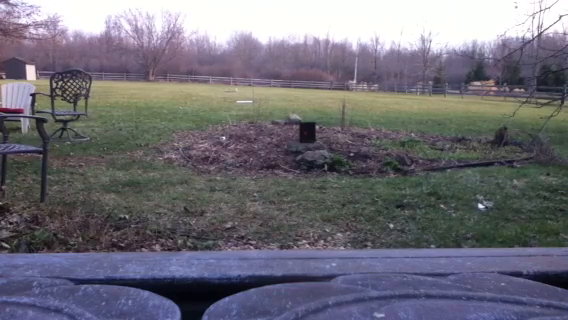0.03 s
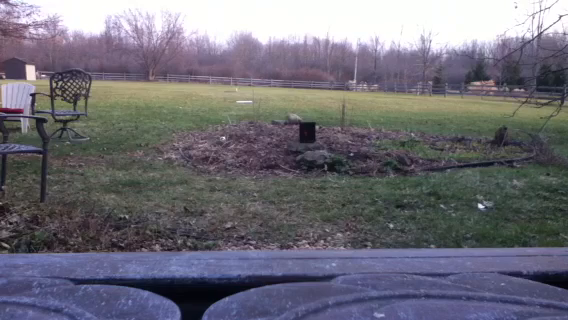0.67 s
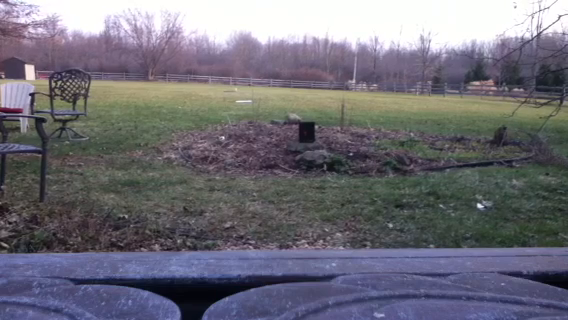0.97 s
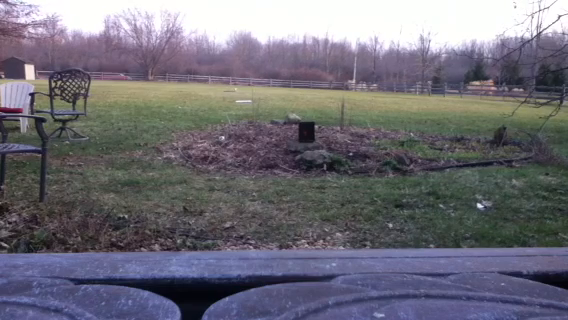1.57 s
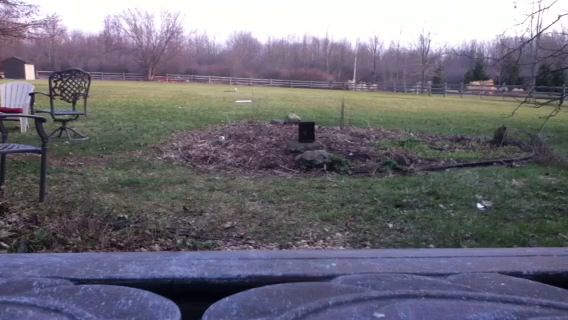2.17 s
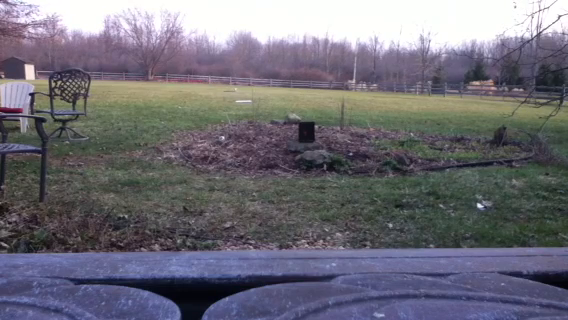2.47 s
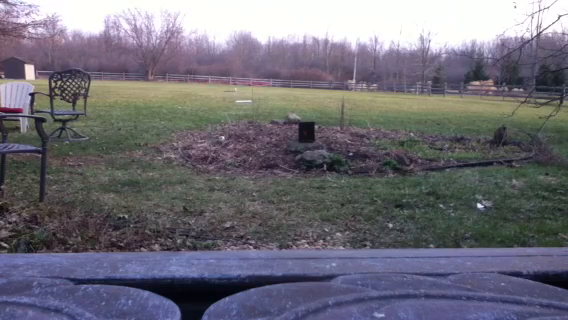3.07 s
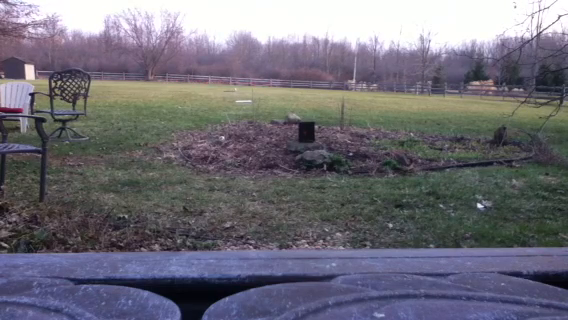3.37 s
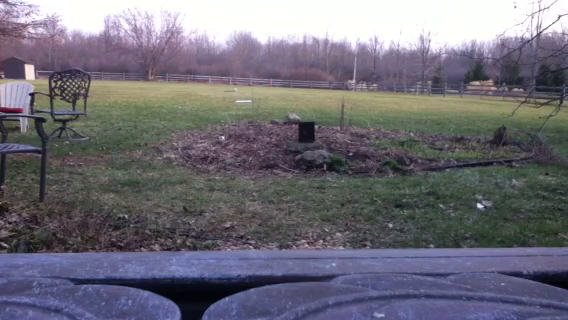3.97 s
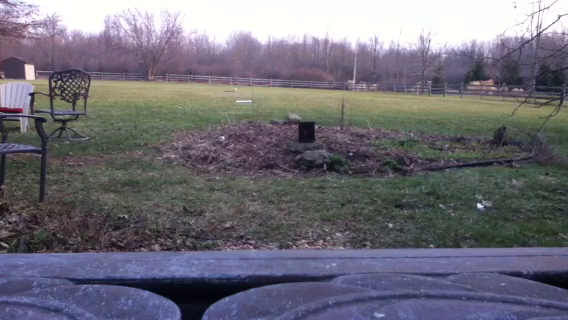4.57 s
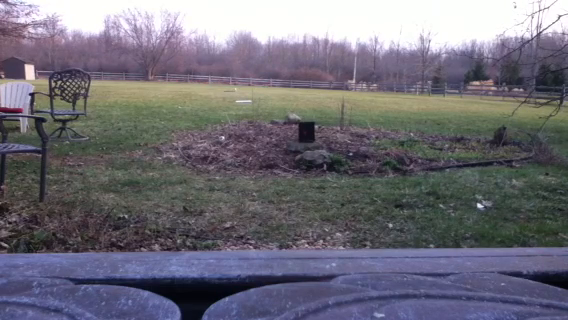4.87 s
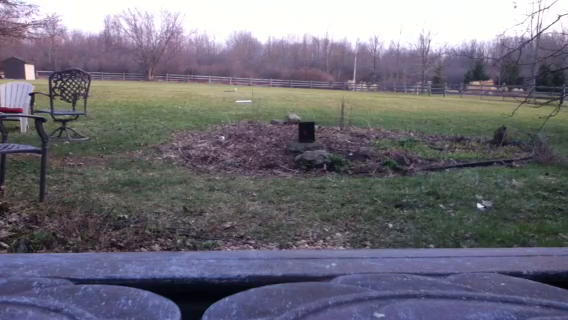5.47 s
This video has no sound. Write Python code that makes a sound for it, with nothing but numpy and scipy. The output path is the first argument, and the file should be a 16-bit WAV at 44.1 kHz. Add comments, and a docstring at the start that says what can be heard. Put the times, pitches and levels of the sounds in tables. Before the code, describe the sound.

Close by on a backyard porch, a pump air rifle pops once and a more distant steel can answers with a bright ping. After a short lull come clothing rustle and the squeaky metal snaps of reloading. Four steady pump strokes follow, each a soft rubbing swing ending in a sharp, hollow clap. The sounds have a short echo, and a quiet low rumble of open air lies underneath.

```python
"""A pump air rifle is fired from a porch: released air pops, and the pellet sets a steel can ringing.
Sleeves rustle by friction; the bolt squeaks by stick-slip and snaps open and shut. The pump lever is
then swung out and clapped home four times, each impact exciting the modes of the hollow fore-end and
squeezing air through the valve. Porch and yard reverberate over a low outdoor rumble."""
import sys
import numpy as np
from scipy import signal
from scipy.fft import rfft, irfft, next_fast_len
from scipy.io import wavfile
from scipy.ndimage import uniform_filter1d

SR = 44100
rng = np.random.default_rng(int(sys.argv[2]) if len(sys.argv) > 2 else 0)


def wav_out(sig):
    """Save sig, one row per channel (or a flat mono array), as 16-bit PCM at SR to the path in sys.argv[1]."""
    wavfile.write(sys.argv[1], SR, np.round(np.clip(np.atleast_2d(sig).T, -1, 1) * 32767).astype(np.int16))


N = 251811
TIME = np.arange(N) / SR
AGE = np.arange(2 ** 15) / SR   # time since an event began [s]

# spectra of the noises and of the reverberation: (frequency [Hz], relative level [dB])
RUMBLE_SPECTRUM = [(15, -2), (30, -3), (60, -6.5), (160, -7), (300, -12.5), (600, -22), (2000, -53)]
HUSH_SPECTRUM = [(100, 1.5), (500, -4), (1600, 6), (2800, -3.5), (6000, -7.5), (12000, -12.5),
                 (16000, -19.5)]
SHOT_SPECTRUM = [(60, -1.5), (300, 1.5), (900, 0.5), (2500, -3.5), (5000, 3), (8000, 3.5), (12000, 3),
                 (14000, -18.5), (16000, -25)]
CAN_SPECTRUM = [(100, -15), (1000, -10), (1800, -0.5), (3000, 0), (6500, 6.5), (10000, 7.5), (12500, 6),
                (16000, -16.5)]
FRICTION_SPECTRUM = [(200, -44), (500, -10), (690, 4.5), (900, 1), (1500, 1), (2300, 2.5), (3500, 5),
                     (6500, 1.5), (8500, 4.5), (11000, -7.5), (13500, -13.5), (16000, -49)]
STEEL_SPECTRUM = [(100, -28), (450, -10.5), (750, 0.5), (1300, 1), (2500, 6.5), (4500, 7.5), (7000, 3.5),
                  (10000, 3), (13000, -0.5), (16000, -20)]
LEVER_SPECTRUM = [(60, -31), (170, -14), (290, 4.5), (450, -0.5), (850, 2), (1400, 10.5), (2600, 11.5),
                  (3600, 7), (6000, 5), (9000, 1), (12000, -5.5), (16000, -31)]
REVERB_SPECTRUM = [(100, -5), (500, 1.5), (1500, 1), (4000, -1.5), (8500, 2.5), (12000, 0.5), (16000, -3.5)]
# slow course of the rumble: (time [s], level before RUMBLE_GAIN_DB [dB])
RUMBLE_LEVELS = [(1.5, -53.5), (3.18, -52), (4.96, -57.5), (5.7, -54.5)]
# hammer, then air blast: (time [s], level [dB], t60 [s], ring frequency [Hz], ring level [dB])
SHOT_PULSES = [(0.0361, -16, 0.043, 5140, -12.5), (0.0401, -6, 0.0073, 598, -32.5),
               (0.047, -24, 0.094, 280, -36), (0.0546, -5, 0.001, 620, -37.5),
               (0.063, -34, .03, 6680, -35.5)]
# pellet on the can, then falling bits: (time [s], level [dB], t60 [s], gain of the modes [dB])
CAN_IMPACTS = [(0.111, -15, 0.05, -31.5), (0.253, -47.5, 0.044, -80), (0.301, -51.5, 0.05, -76.5)]
# normal modes of the can and the fore-end's shell: (frequency [Hz], relative level [dB], t60 [s])
CAN_MODES = [(469, -5.5, 0.33), (731, -12, 0.11), (1245, -16.5, 0.52), (1627, -3.5, 0.25),
             (1773, -11.5, 0.49), (1960, -7.5, .13), (2310, -7, 0.12), (2860, -25, .3), (3515, -5, .14),
             (4360, -13.5, 0.17), (6240, -14.5, 0.52), (7000, -8.5, 0.15), (7500, -3, .11),
             (9330, 10, 0.092), (9889, -24, .19), (11530, -21.5, .3)]
FORE_END_MODES = [(1028, -4, 0.071), (1177, -19, 0.1), (1337, -3, 0.16), (1384, 3.5, 0.068),
                  (1415, -11.5, 0.33), (1540, -10.5, 0.26), (1590, -1.5, 0.15), (1690, 1.5, 0.045),
                  (2287, -10, 0.033), (2340, 12, 0.019), (2800, -4.5, 0.05), (3760, -7, 0.14),
                  (4600, -17, 0.23)]
# sleeves and hands: (peak time [s], level [dB], 60 dB rise [s], 60 dB release [s])
SLEEVE_RUSTLES = [(1.03, -56, 0.41, 0.6), (1.12, -53.5, 0.28, 0.18), (1.38, -43.5, 0.35, 0.29),
                  (1.5, -41.5, 0.16, 0.67), (1.73, -54, 0.68, 0.2), (2.56, -51, .35, .7),
                  (2.78, -53.5, .7, 0.71), (3.335, -39.5, 0.1, 0.23), (3.5, -57, 0.43, 0.32),
                  (4.4, -45, 0.36, 0.15), (4.94, -53.5, 0.23, 0.98)]
# bolt and linkage contacts: (time [s], level [dB], t60 [s], ring frequency [Hz], tilt [dB/octave])
STEEL_CLICKS = [(1.4566, -41.5, .04, 3320, 0), (1.801, -27, .018, 3220, -3),
                (1.8055, -17.5, 0.023, 2450, 1), (1.8187, -16, 0.028, 2920, 0), (1.838, -31, .035, 2450, 1),
                (1.871, -15, 0.025, 3550, 2.5), (2.0673, -27, 0.024, 2610, -1),
                (2.1214, -38, 0.023, 2650, -2.5), (2.147, -33.5, 0.12, 765, -3),
                (2.1719, -19, 0.047, 1170, -0.5), (2.3833, -48, 0.067, 3450, -0.5),
                (2.4805, -33, 0.054, 3190, .5), (2.6989, -45, 0.026, 4280, 1.5),
                (2.822, -25.5, 0.025, 2280, -3), (2.834, -25.5, 0.029, 1830, -2.5),
                (2.848, -31.5, 0.073, 1260, -2), (3.0519, -40, .025, 6020, 0.5),
                (3.601, -38, 0.021, 5450, -4), (3.636, -39, 0.035, 2750, -5),
                (3.6749, -35.5, .03, 2340, -4.5), (4.3164, -34.5, 0.019, 2790, -3.5),
                (5.0556, -38, 0.031, 2740, -3.5), (5.348, -45, 0.044, 2550, -4),
                (5.637, -45.5, 0.036, 2500, -3)]
# stock against the body: (time [s], level [dB], frequency [Hz], t60 [s])
STOCK_BUMPS = [(1.49, -42.5, 194.4, 0.41), (1.492, -41.5, 308, 0.087)]
# dry bolt, one list a squeak: (time [s], frequency [Hz], level [dB])
BOLT_SQUEAKS = [
    [(1.665, 8320, -66), (1.685, 9960, -46), (1.71, 10500, -63)],
    [(1.735, 5870, -57), (1.768, 5650, -38), (1.785, 5620, -50), (1.803, 5730, -32)],
    [(1.92, 5690, -58), (1.96, 5260, -57), (2.01, 4950, -49.5), (2.065, 4800, -60)],
]
# swinging lever: (time [s], level [dB], t60 [s], ring frequency [Hz], ring level [dB])
LEVER_KNOCKS = [(2.557, -38, 0.027, 2150, -37), (2.7357, -55, .02, 2470, -44),
                (2.823, -34, 0.044, 1800, -33), (2.954, -41, 0.07, 4400, -32),
                (2.9633, -33.5, 0.017, 2300, -27.5), (3.0944, -42.5, 0.047, 2320, -49),
                (3.1841, -39, 0.051, 2570, -32), (3.195, -26.5, 0.042, 1020, -19.5),
                (3.4173, -36, 0.051, 2090, -27.5), (3.8194, -47, 0.014, 2000, -52),
                (3.9387, -50, .036, 2580, -32.5), (3.946, -49, 0.079, 2470, -32.5),
                (4.1606, -40.5, 0.066, 2250, -25), (4.329, -37.5, 0.13, 2090, -34),
                (4.4148, -38.5, 0.038, 2310, -32.5), (4.5467, -48, 0.023, 2470, -44.5),
                (4.599, -50, 0.048, 2380, -45), (4.8797, -42.5, 0.092, 2160, -24),
                (5.069, -41.5, 0.24, 2250, -31), (5.1315, -44.5, 0.025, 4300, -39),
                (5.2611, -60, 0.019, 1070, -45), (5.503, -50, .03, 2020, -28),
                (5.5776, -40.5, 0.033, 2330, -45)]
# pump strokes: (clap time [s], level [dB], t60 [s], tilt [dB/octave], slap frequency [Hz],
# fore-end gain [dB], thump [dB], cavity [dB], swing-in slide [dB], squeeze [dB], swing-out slide [dB])
PUMP_STROKES = [(3.204, -17, 0.054, -1.4, 1400, -21, -18.5, -40, -39, -48, -42.5),
                (3.9623, -16.5, 0.059, 2, 2590, -23, -34, -26, -54.5, -72, -46.5),
                (4.6754, -17.5, 0.034, 0.5, 2672, -25, -33, -27, -49.5, -70, -47),
                (5.4066, -15.5, 0.058, -.3, 1440, -19.5, -27.5, -25, -53, -53, -39.5)]
# the slides of a stroke: (peak time after the clap [s], 60 dB rise [s], 60 dB release [s])
SWING_IN, SQUEEZE, SWING_OUT = (-0.338, 0.12, 0.35), (-0.054, 0.46, 1), (0.12, 0.41, 0.51)
# air in the valve and in the gap under the lever: (time after the clap [s], frequency [Hz])
VALVE_PITCH = [(0, 3200), (.013, 9000), (.03, 10000)]
GAP_PITCH = [(.04, 1450), (.11, 2100)]
# their envelopes: (time after the clap [s], relative amplitude [1])
VALVE_ENVELOPE = [(0, .72), (.005, .36), (.013, 1), (.019, 0)]
GAP_ENVELOPE = [(0, 0), (.09, 1), (.25, 0)]

PORCH_DB, PORCH_T60, YARD_DB = -3.5, 0.24, -30.5   # reverberation: gain, decay [s], the yard's share
RUMBLE_GAIN_DB, HUSH_DB = 1.5, -59.5
DIP_DB, DIP_HOLD_S, DIP_RECOVERY_S = 11, 0.38, 1
TREES_DB, TREES_T60 = -53, 1.6
CLICK_RING_DB, CLICK_T60, CLICK_DAMPING_DB = 2, 0.027, 9   # ring gain at this t60 [s]; loss per doubling
CAVITY_HZ, CAVITY_T60, OPEN_LEAK_T60 = 677, 0.19, 0.32
KNOCK_CAVITY_DB, GAP_DB = -1, -5   # relative to the knock; to the swing-out slide
SLAP_DB, VALVE_DB, LATCH_DB = 7.5, -10.5, -7   # relative to the clap
SLIDE_FLUTTER_DB, SLIDE_JERK_DB = 1.47, 2.85
INTAKE_DELAY_S, INTAKE_DB = .144, -41


def from_db(db):
    """Amplitude grows tenfold with every 20 dB."""
    return 10 ** (np.asarray(db) / 20)


def rms_one(x):
    """Division by the RMS value gives unit power."""
    return x / np.sqrt(np.mean(x ** 2) + 1e-20)


def add(out, s, sound):
    """Superposition: a sound adds to the others from time s on."""
    start = max(0, round(s * SR))
    out[start:start + len(sound)] += sound[:N - start]


def fade(t60):
    """Damping: amplitude falls exponentially, by 60 dB in t60 seconds."""
    return from_db(-60 * AGE / max(t60, 1e-3))


def swell(peak_s, rise_s, release_s):
    """Exponential growth and decay meet at a peak; rise and release each span 60 dB."""
    return from_db(-60 * np.maximum((peak_s - TIME) / rise_s, (TIME - peak_s) / release_s))


def drift(rate, size):
    """A random process of limited bandwidth: Gaussian values, rate a second, joined by lines."""
    knots = rng.standard_normal(size // 8)
    return np.interp(np.arange(size) * rate / SR, np.arange(len(knots)), knots)


def colour(x, spectrum, tilt_db=0):
    """A minimum-phase filter imposes a spectrum, tilted by tilt_db an octave about 4 kHz."""
    size = next_fast_len(len(x), real=True)
    size += size % 2
    octave = np.log2(np.maximum(np.fft.rfftfreq(size, 1 / SR), 10) / 4000)
    hz, db = np.transpose(spectrum)
    shape_db = np.interp(octave, np.log2(hz / 4000), db) + tilt_db * np.maximum(octave, -3)
    cepstrum = irfft(np.log(from_db(shape_db)))
    # folding the cepstrum makes the filter causal
    cepstrum[1:size // 2] *= 2
    cepstrum[size // 2 + 1:] = 0
    return irfft(rfft(x, size) * np.exp(rfft(cepstrum)))[:len(x)]


def crack(t60, spectrum, tilt_db=0):
    """Modal overlap: dense, short-lived modes merge into noise; longer contacts start more softly."""
    attack = 1 - fade(min(0.5 * t60 ** 2, t60 / 2))
    envelope = fade(t60) * attack
    burst = rng.standard_normal(len(AGE)) * envelope
    return colour(burst * np.linalg.norm(envelope) / np.linalg.norm(burst), spectrum, tilt_db)


def ring(hz, t60):
    """A damped mode; rattling loose parts modulate its phase and amplitude, most at high pitch."""
    looseness = min(hz / 2500, 1)
    blur = .7 * looseness * drift(130, len(AGE))
    rattle = from_db(2 * looseness * drift(250, len(AGE)))
    return np.sin(2 * np.pi * hz * AGE + blur - blur[0]) * rattle * fade(t60)


def ring_all(modes, scatter_db):
    """A struck body vibrates as a sum of normal modes, weighted anew by every blow."""
    return sum(rng.choice([-1, 1]) * from_db(db + scatter_db * rng.standard_normal()) * ring(hz, t60)
               for hz, db, t60 in modes)


def noise_band(hz, width_hz):
    """Random quadrature modulation spreads a tone into a band of noise."""
    phase = 2 * np.pi * np.cumsum(hz) / SR
    return rms_one(drift(width_hz, len(hz)) * np.sin(phase) + drift(width_hz, len(hz)) * np.cos(phase))


def linger(power, t60):
    """Sound energy stored in a space leaks away exponentially."""
    retained = from_db(-120 / (max(t60, 1e-3) * SR))
    return signal.lfilter([1 - retained], [1, -retained], power + 1e-18)


def porch(x, wet_db=PORCH_DB, t60=PORCH_T60, yard_db=YARD_DB):
    """Diffuse reverberation: boards and wall add a short tail, the yard a faint long one."""
    arriving = linger(x ** 2, t60=0.027)
    power = linger(arriving, t60) + from_db(2 * yard_db) * linger(arriving, t60=0.63) / t60
    # many paths blur the fine spectrum of the source
    timbre = np.sqrt(np.abs(uniform_filter1d(np.abs(rfft(x)) ** 2, size=len(x) // 110)))
    scattered = irfft(timbre * np.exp(2j * np.pi * rng.random(len(timbre))), len(x))
    return x + from_db(wet_db) * np.sqrt(power) * rms_one(colour(scattered, REVERB_SPECTRUM))


def open_air():
    """Ambient rumble and hush dip at the shot, whose echo from the trees adds to the hush in power."""
    since_shot = TIME - SHOT_PULSES[0][0]
    depth = (since_shot > 0) * np.clip(1 - (since_shot - DIP_HOLD_S) / DIP_RECOVERY_S, 0, 1)
    dip = from_db(-DIP_DB * depth)
    rumble_db = np.interp(TIME, *np.transpose(RUMBLE_LEVELS)) + RUMBLE_GAIN_DB
    rumble = from_db(rumble_db) * rms_one(colour(rng.standard_normal(N), RUMBLE_SPECTRUM))
    hush = rms_one(colour(rng.standard_normal(N), HUSH_SPECTRUM))
    echo = from_db(TREES_DB) * swell(CAN_IMPACTS[0][0], rise_s=.1, release_s=TREES_T60)
    return dip * rumble + np.hypot(dip * from_db(HUSH_DB), echo) * hush


def shot():
    """Sudden expansion: the hammer opens the valve and compressed air pops out of the muzzle."""
    out = np.zeros(N)
    for s, db, t60, hz, ring_db in SHOT_PULSES:
        add(out, s, from_db(db) * crack(t60, SHOT_SPECTRUM) + from_db(ring_db) * ring(hz, t60=0.016))
    return out


def can():
    """Impulse excitation: the pellet smacks thin steel, which rings on in its normal modes."""
    out = np.zeros(N)
    for s, db, t60, ring_db in CAN_IMPACTS:
        smack = from_db(db) * crack(t60, CAN_SPECTRUM)
        add(out, s, smack + from_db(ring_db) * ring_all(CAN_MODES, scatter_db=5.5))
    return out


def friction_envelope():
    """Incoherent sources add in power: the rustles, and three slides to each pump stroke."""
    moves = list(SLEEVE_RUSTLES)
    for s, *_, in_db, squeeze_db, out_db in PUMP_STROKES:
        slides = [(in_db, SWING_IN), (squeeze_db, SQUEEZE), (out_db, SWING_OUT)]
        for db, (after_s, rise_s, release_s) in slides:
            moves.append((s + after_s, db, rise_s, release_s))
    return np.sqrt(sum((from_db(db) * swell(s, rise, release)) ** 2 for s, db, rise, release in moves))


def rubbing():
    """Sliding friction of sleeves and piston makes a hiss, roughened by slips of a few milliseconds."""
    unevenness = from_db(SLIDE_FLUTTER_DB * drift(160, N) + SLIDE_JERK_DB * drift(55, N))
    slips = (rng.random(N) < 160 / SR) * rng.random(N) ** 2   # about 160 a second
    grit = signal.fftconvolve(slips, fade(.01))[:N]
    friction = rng.standard_normal(N) * (1 + 2 * grit)
    return friction_envelope() * unevenness * rms_one(colour(friction, FRICTION_SPECTRUM))


def snap(db, t60, tilt_db):
    """A brief contact of steel on steel radiates a broad spectrum, which the porch scatters."""
    return porch(from_db(db) * crack(t60, STEEL_SPECTRUM, tilt_db), t60=0.16)


def steel_clicks():
    """Contact damping: bolt and linkage snap and ring, the more weakly the longer they touch."""
    out = np.zeros(N)
    for s, db, t60, hz, tilt_db in STEEL_CLICKS:
        ring_db = db + CLICK_RING_DB - CLICK_DAMPING_DB * np.log2(t60 / CLICK_T60)
        add(out, s, snap(db, t60, tilt_db) + from_db(ring_db) * ring(hz, t60=0.018))
    return out


def stock_bumps():
    """A soft impact excites only low frequencies: the stock thuds against the body."""
    out = np.zeros(N)
    for s, db, hz, t60 in STOCK_BUMPS:
        thud = noise_band(np.full(len(AGE), hz), width_hz=123)
        add(out, s, from_db(db) * thud * (fade(t60) - fade(0.007)))
    return out


def bolt_squeaks():
    """Stick-slip oscillation of dry steel gives a thin, unsteady tone with a skirt of hiss."""
    out = np.zeros(N)
    for squeak in BOLT_SQUEAKS:
        s, hz, db = np.transpose(squeak)
        pitch = np.interp(TIME, s, hz) * (1 + .003 * drift(500, N))
        level_db = np.interp(TIME, s, db, left=-140, right=-140) + 2 * drift(150, N)
        envelope = uniform_filter1d(from_db(level_db), size=200)
        tone = np.sin(2 * np.pi * np.cumsum(pitch) / SR)
        out += envelope * (tone + .25 * noise_band(pitch, width_hz=450))
    return out


def lever_knocks():
    """The lever knocks at the turns of its swing and excites the cavity, damped by its open leak."""
    out = np.zeros(N)
    for s, db, t60, hz, ring_db in LEVER_KNOCKS:
        knock = from_db(db) * porch(crack(t60, LEVER_SPECTRUM), wet_db=-6.5, t60=.22)
        ringing = from_db(ring_db) * ring(hz, t60=0.035)
        hollow = from_db(db + KNOCK_CAVITY_DB) * cavity() * fade(OPEN_LEAK_T60)
        add(out, s, (knock + ringing) * (1 - fade(0.0014)) + hollow)
    return out


def cavity():
    """Cavity resonance: the air under the lever takes a few cycles to build up a hollow note."""
    return ring(CAVITY_HZ, CAVITY_T60) * (1 - fade(0.054))


def lever_claps():
    """The impact of the closing lever drives the fore-end's shell and the air inside it."""
    out = np.zeros(N)
    for s, db, t60, tilt_db, hz, ring_db, thump_db, cavity_db, _, _, out_db in PUMP_STROKES:
        air = from_db(db + VALVE_DB) * valve_chirp() + from_db(out_db + GAP_DB) * lever_gap()
        blow = porch(from_db(db) * crack(t60, LEVER_SPECTRUM, tilt_db))
        slap = from_db(db + SLAP_DB) * ring(hz, t60=0.033)
        low_modes = ring(hz=303, t60=0.045) - ring(hz=440, t60=0.018)
        thump = from_db(thump_db) * low_modes * (1 - fade(0.012))
        shell = from_db(ring_db) * ring_all(FORE_END_MODES, scatter_db=1.5)
        add(out, s, blow + slap + thump + shell + from_db(cavity_db) * cavity() + air)
        # the latch grazes just before the lever lands
        add(out, s - .0035, from_db(db + LATCH_DB) * crack(0.06, STEEL_SPECTRUM) * (1 - fade(0.0065)))
        # on the way out the piston uncovers the intake with a tick
        add(out, s + INTAKE_DELAY_S, snap(INTAKE_DB, t60=0.05, tilt_db=3.5))
    return out


def valve_chirp():
    """Flow noise: air squeezed through the valve rises in pitch as the pressure builds."""
    pitch = np.interp(AGE, *np.transpose(VALVE_PITCH))
    return noise_band(pitch, width_hz=2400) * np.interp(AGE, *np.transpose(VALVE_ENVELOPE))


def lever_gap():
    """The resonance of the gap under the lever rises as the opening widens."""
    pitch = np.interp(AGE, *np.transpose(GAP_PITCH))
    return noise_band(pitch, width_hz=780) * np.interp(AGE, *np.transpose(GAP_ENVELOPE))


def scene():
    """The sources superpose in one channel: the rifle close by on the porch, the can farther off."""
    firing = porch(shot(), wet_db=-11.0, t60=0.31, yard_db=-10.5)
    target = porch(can(), wet_db=-8.0, t60=0.23, yard_db=-41)
    reloading = steel_clicks() + lever_knocks() + lever_claps() + bolt_squeaks()
    handling = rubbing() + stock_bumps()
    return (firing + target + reloading + handling + open_air())[None]


def record(dry):
    """Soft saturation rounds the tallest peaks; a low-pass filter cuts the treble above 16.5 kHz."""
    rounded = dry / (1 + (dry / .8) ** 4) ** .25
    low_pass = signal.ellip(10, .2, 80, 16500, fs=SR, output="sos")
    return signal.sosfilt(low_pass, rounded)


dry = scene()
out = record(dry)
wav_out(out)
```